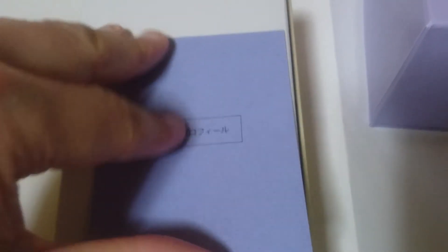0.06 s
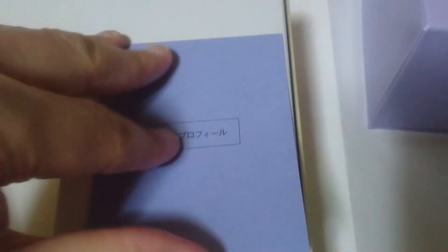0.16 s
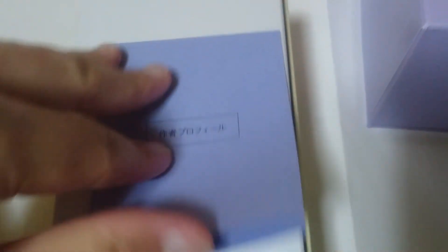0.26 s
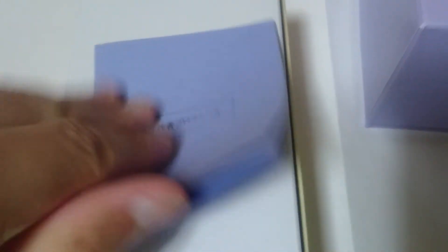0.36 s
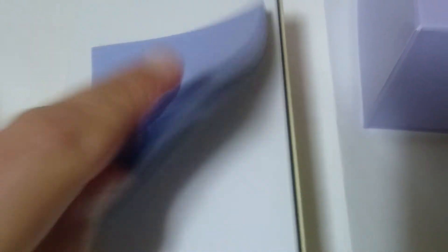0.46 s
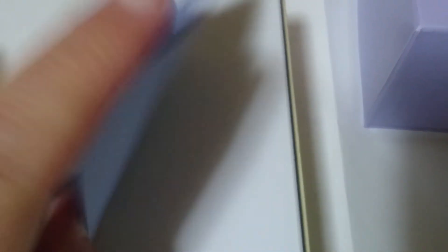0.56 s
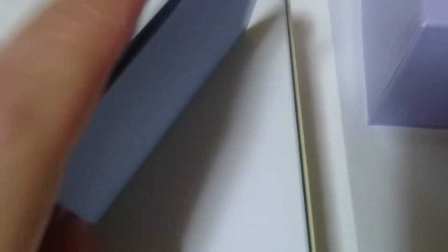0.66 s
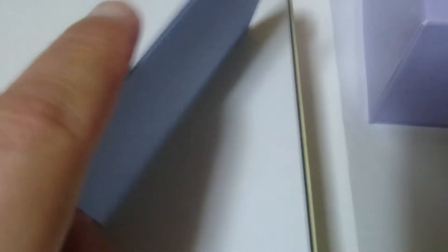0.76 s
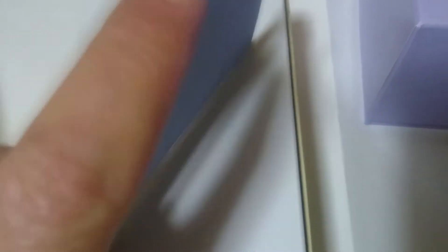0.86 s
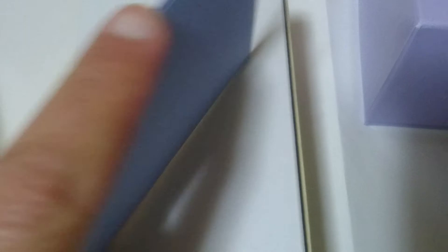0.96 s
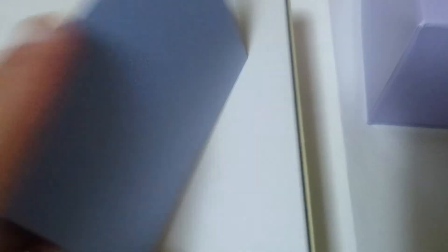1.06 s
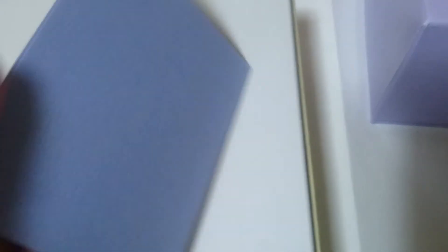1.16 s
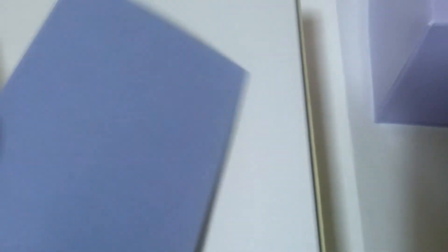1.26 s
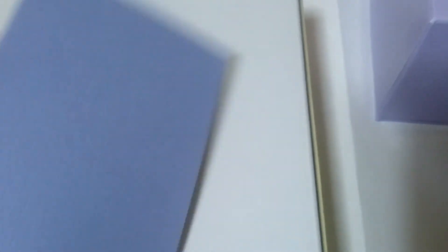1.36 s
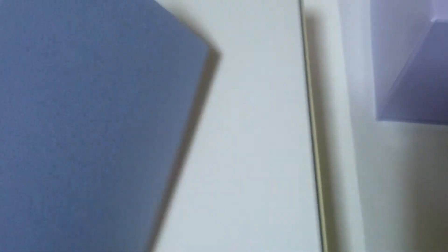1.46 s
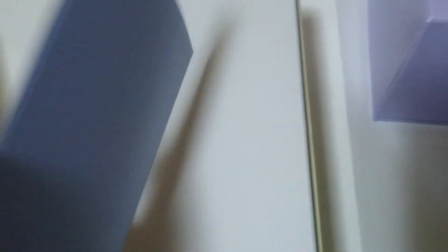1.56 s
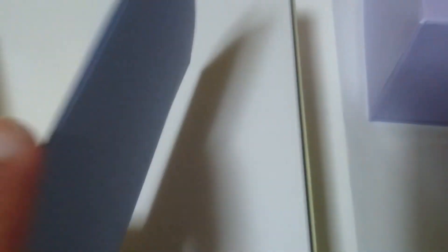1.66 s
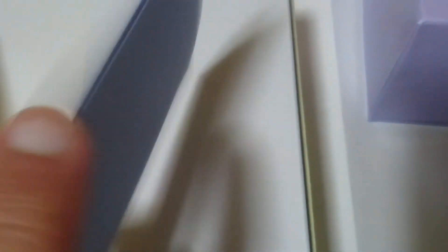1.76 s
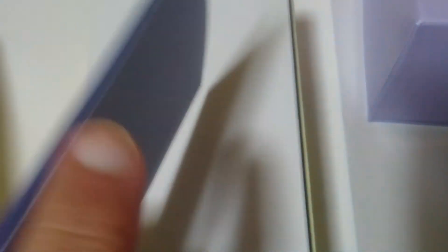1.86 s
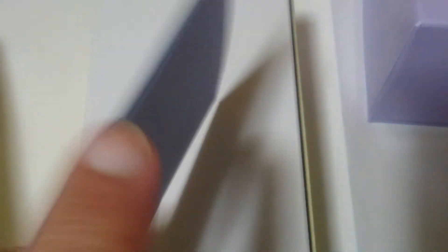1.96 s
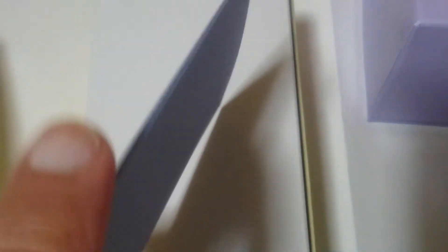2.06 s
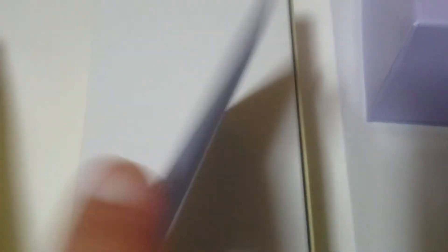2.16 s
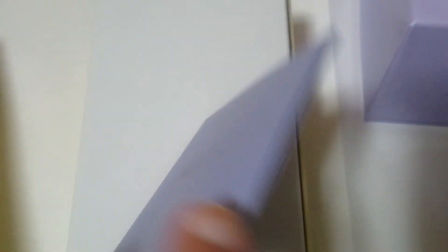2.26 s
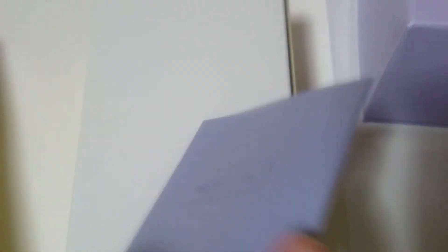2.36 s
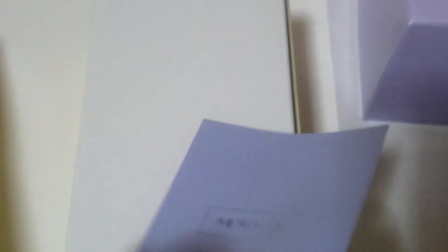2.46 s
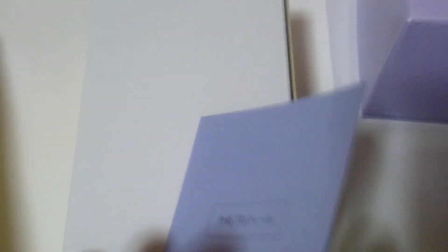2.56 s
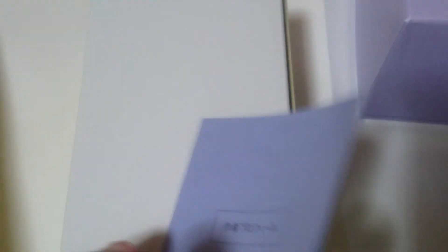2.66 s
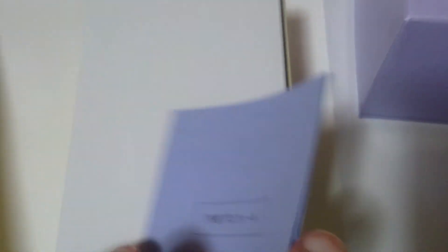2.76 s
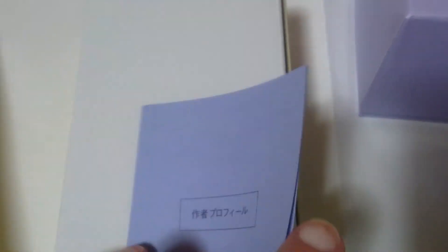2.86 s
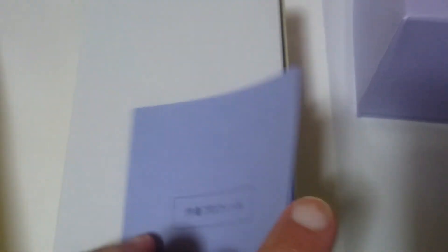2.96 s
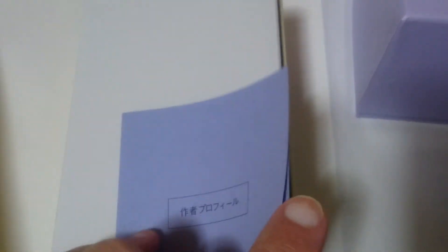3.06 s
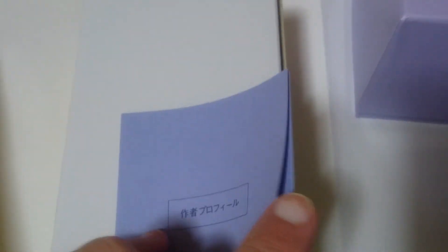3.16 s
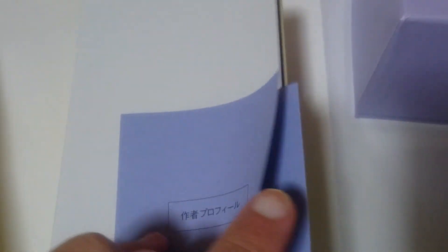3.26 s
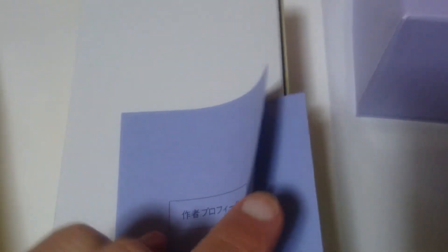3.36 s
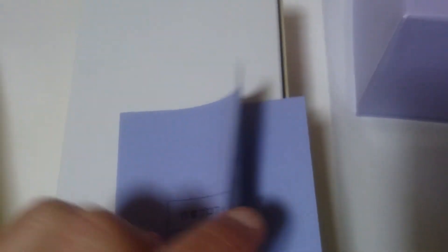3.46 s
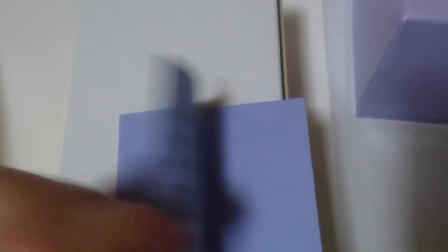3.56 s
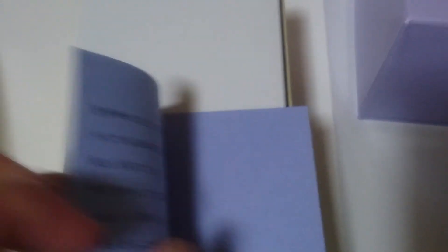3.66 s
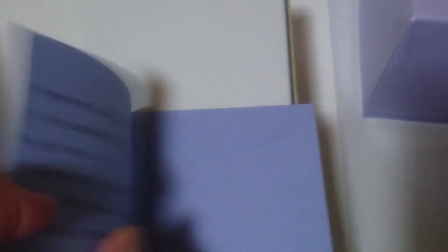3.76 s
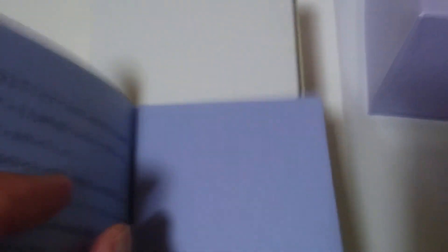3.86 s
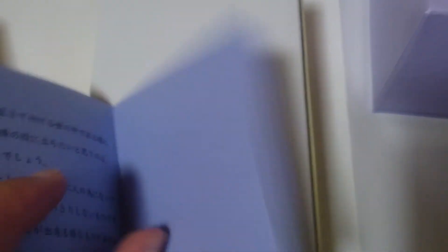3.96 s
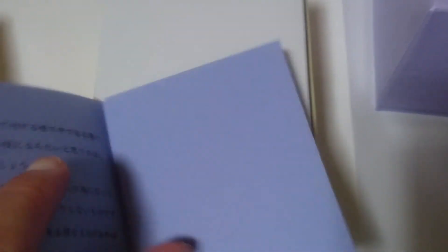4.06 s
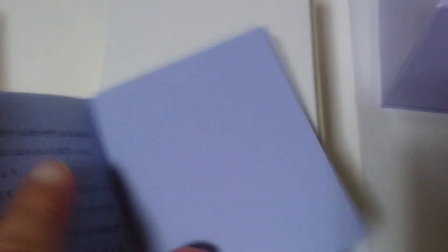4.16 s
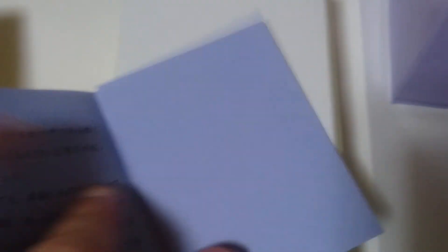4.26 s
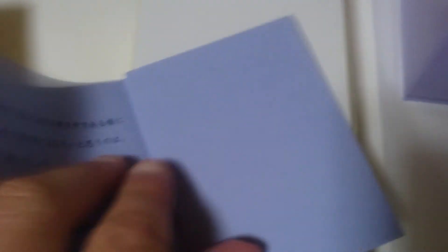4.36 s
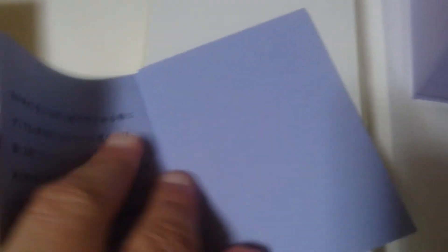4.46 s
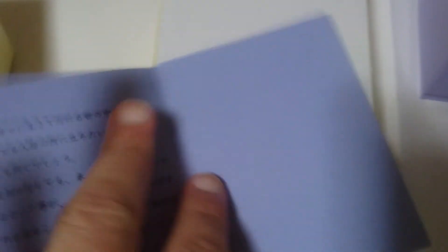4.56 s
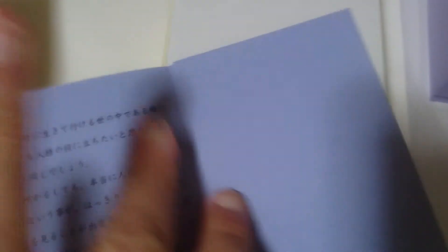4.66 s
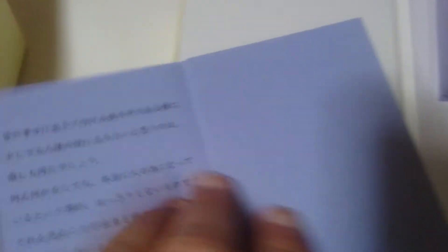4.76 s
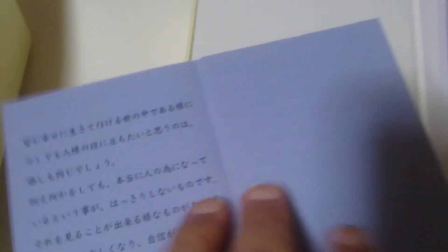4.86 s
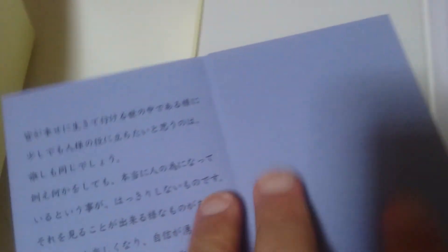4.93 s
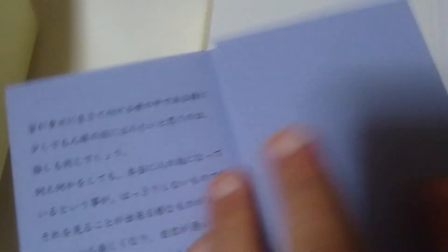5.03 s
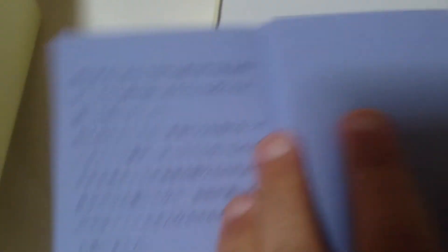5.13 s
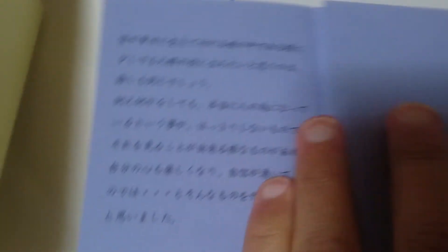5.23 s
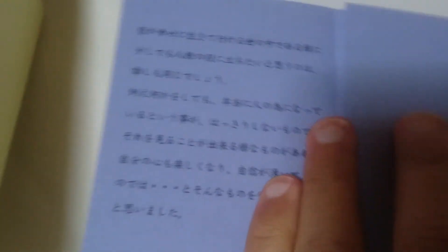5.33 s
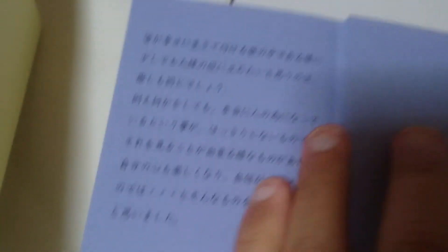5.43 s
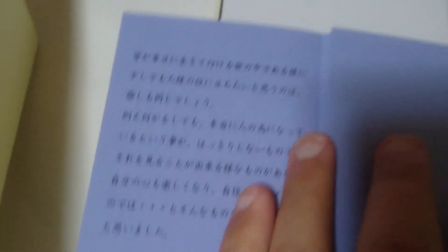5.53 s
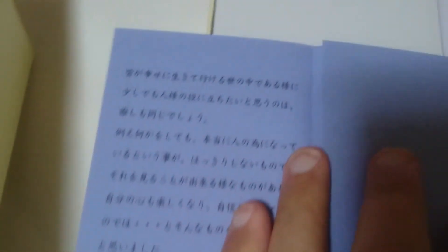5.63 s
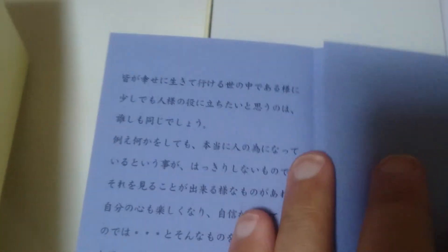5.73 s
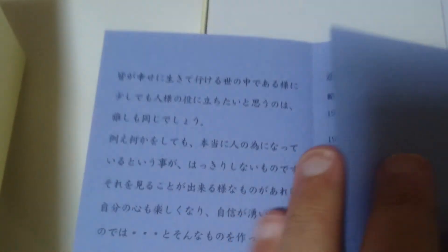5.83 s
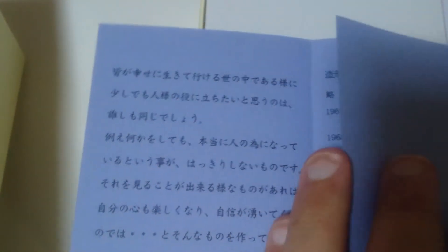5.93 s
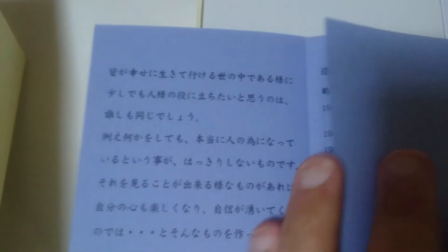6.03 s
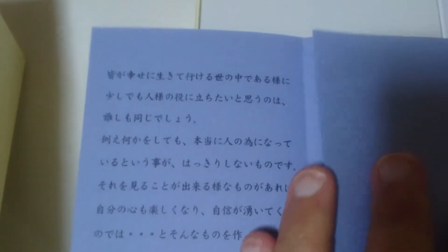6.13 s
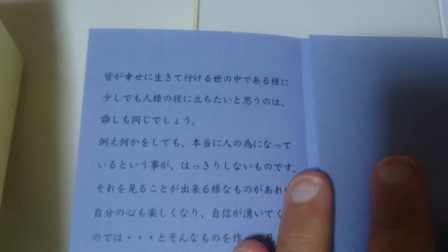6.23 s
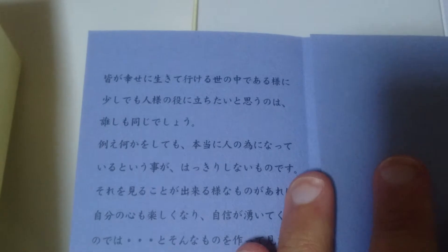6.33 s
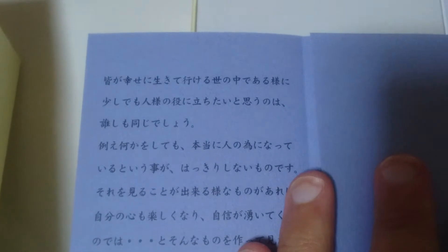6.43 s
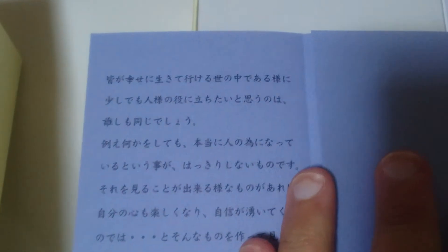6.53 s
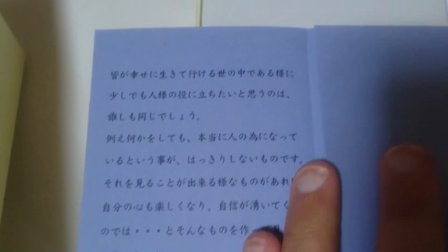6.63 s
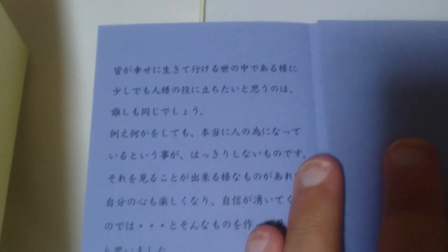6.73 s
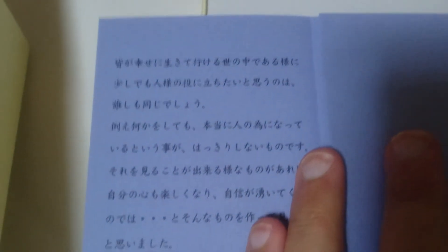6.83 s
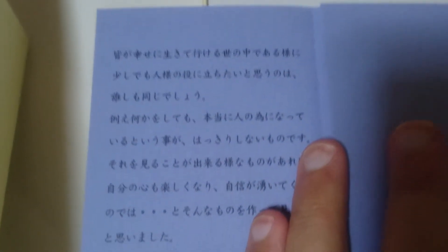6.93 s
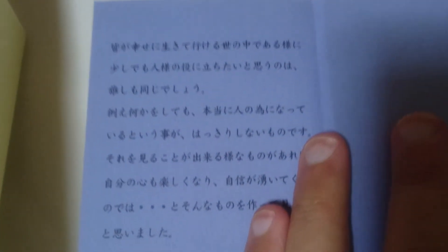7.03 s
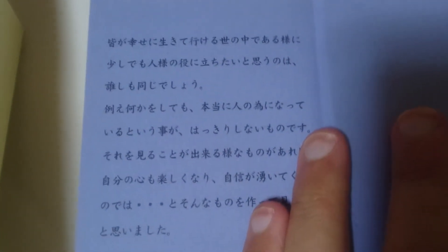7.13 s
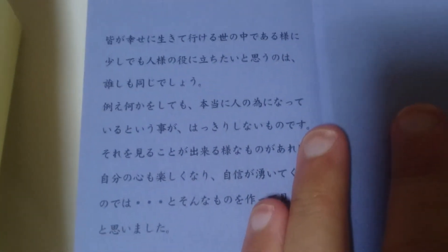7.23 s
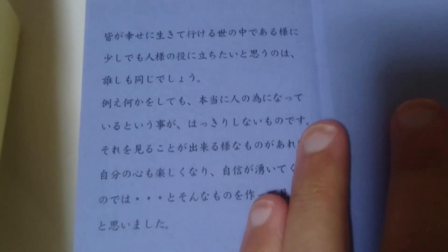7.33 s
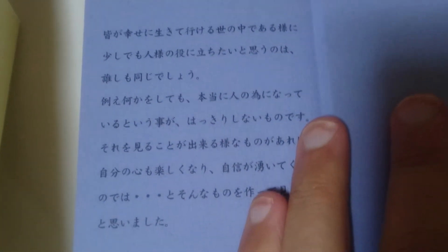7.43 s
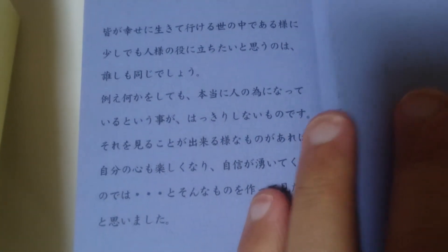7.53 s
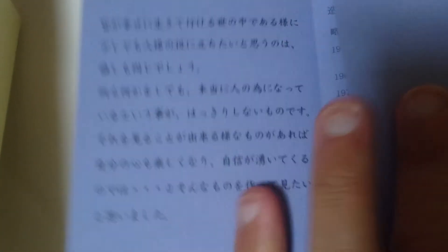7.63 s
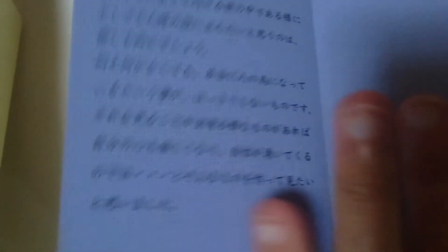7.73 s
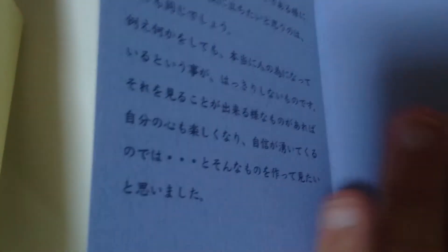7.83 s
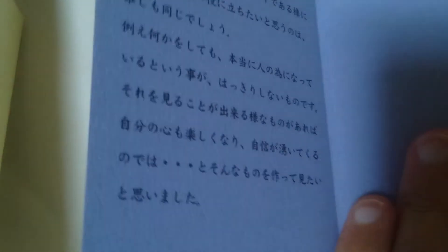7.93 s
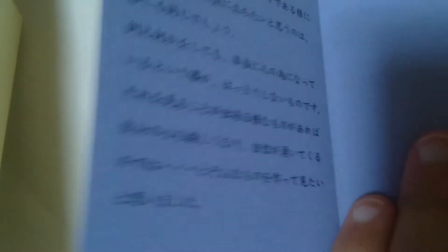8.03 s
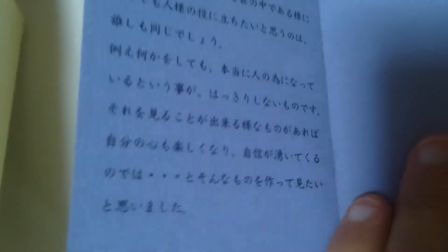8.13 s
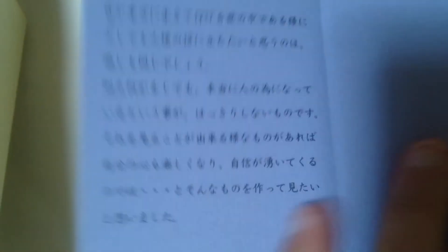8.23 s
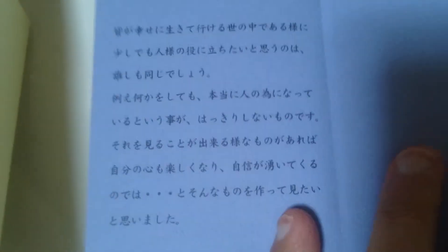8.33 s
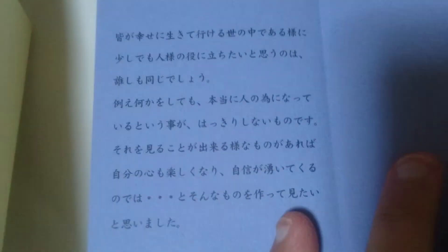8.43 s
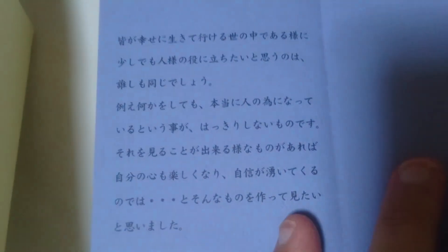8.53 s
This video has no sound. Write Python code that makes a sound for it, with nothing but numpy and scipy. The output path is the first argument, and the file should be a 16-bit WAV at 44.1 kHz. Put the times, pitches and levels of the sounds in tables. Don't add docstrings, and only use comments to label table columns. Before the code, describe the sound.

Close up, fingers handle a small stiff-paper booklet in a quiet room: dry hissing slides, edge scrapes, sharp snaps, hard crackling buckles, then near silence and one brief flip.

```python
import sys
import numpy as np
from scipy import signal
from scipy.fft import rfft, irfft, next_fast_len
from scipy.io import wavfile
from scipy.ndimage import uniform_filter1d, map_coordinates

SR = 44100
rng = np.random.default_rng(int(sys.argv[2]) if len(sys.argv) > 2 else 0)


def wav_out(sig):
    wavfile.write(sys.argv[1], SR, np.round(np.clip(np.atleast_2d(sig).T, -1, 1) * 32767).astype(np.int16))


def magnitude_from_level(level_db):
    exponent = np.asarray(level_db, float) / 20
    return 10 ** exponent


N = 378819
TOP_HZ = 15900

# time_s, drag_db, lightness (light is bright, heavy is dull)
LIFT = [
    (0, -66, -1),
    (.16, -63.5, 1),
    (.3, -58.5, 5),
    (.45, -62, 4.5),
    (.54, -58, 9),
    (.62, -49.5, 4),
    (.69, -62.5, -1),
    (.78, -53.5, -7.5),
    (.85, -73, -12.5),
]
TURN = [
    (1.03, -67.5, 4),
    (1.15, -56.5, 0),
    (1.225, -58.5, -4),
    (1.255, -68, 0.5),
    (1.42, -64, 0),
    (1.48, -74.5, -0.5),
    (1.59, -70, 3.5),
    (1.8, -64.5, -2.5),
    (1.93, -84.5, -4),
]
LAY = [
    (2.17, -88, 0),
    (2.3, -66, -3),
    (2.54, -63, 0.5),
    (2.73, -58, 0.5),
    (2.85, -64.5, -9),
    (2.96, -67, 4),
    (3.12, -71, 0),
    (3.3, -71, 1.5),
]
OPEN = [
    (3.46, -60, -1.8),
    (3.6, -58.5, 1),
    (3.635, -49.5, -1),
    (3.665, -58, -1.8),
    (3.715, -46.5, 0),
    (3.752, -50.5, -1),
    (3.78, -46.5, 1),
    (3.84, -48.5, 0),
    (3.94, -59.5, -1.5),
]
SPREAD = [
    (4.02, -56, 5),
    (4.16, -55.5, 5.5),
    (4.22, -52, 0.5),
    (4.3, -61.5, 1),
]
PRESS = [
    (4.43, -52, 3),
    (4.511, -44, 0.5),
    (4.651, -63, 1.3),
    (4.75, -54, 0.72),
    (4.87, -57.5, 9.5),
    (5.07, -67.5, 0.5),
]
SWEEP = [
    (5.11, -54, 0),
    (5.14, -42.5, -1),
    (5.21, -46.5, -1),
    (5.3, -52.5, -0.91),
    (5.35, -61, -0.91),
    (5.41, -56.5, 0),
    (5.465, -63, 0),
    (5.5, -63, -2),
]
SMOOTH = [
    (5.6, -64, -2.5),
    (5.89, -69, -3),
    (6.01, -65.5, 0),
    (6.11, -77, 1.5),
    (6.33, -73, 1.5),
    (6.5, -100, -2.5),
]
FLIP = [
    (7.65, -101, 1),
    (7.68, -71, 3),
    (7.73, -76, -1),
    (7.85, -58, 1),
    (7.93, -57, 1.5),
    (8.03, -76, -10),
    (8.24, -71.5, -5),
    (8.46, -76, -0.5),
    (8.59, -98, -5),
]
# over_drag_db, per_lightness_db
ANSWER = [(-2, -0.34), (-0.5, 0.49), (-8.5, 1.39), (-25, 3)]
# start_s, length_s, loss_db
ALOFT = [
    (.24, 0.39, 0.5),
    (2.892, 0.11, 5.5),
    (3.464, 0.347, 14.5),
    (5.1, 0.25, 5),
]
# start_s, length_s, first_hz, last_hz, lift_db
CUPS = [(0, 0.31, 1500, 1470, 5.5), (0, .25, 479.4, 520, 7), (.23, .2, 6700, 7000, 4),
        (.25, 0.26, 4300, 4400, 6), (.49, .1, 1952, 1950, 6.5), (1.06, .09, 6600, 6700, 5),
        (1.064, 0.27, 2850, 3370, 5), (1.14, 0.068, 702, 800, 7), (1.58, .08, 6700, 6600, 6),
        (1.65, 0.18, 1205, 1280, 15), (1.76, 0.065, 2395, 2590, 7), (2.66, 0.27, 1224, 1330, 8),
        (3.45, 0.23, 2050, 2000, 8.5), (3.57, .07, 6900, 7100, 6), (3.61, .045, 2300, 2299, 6),
        (3.68, .07, 3200, 3000, 7), (3.67, 0.24, 1800, 1844, 5), (3.76, 0.043, 3294, 3000, 4.5),
        (3.937, 0.39, 2506, 2630, 3.5), (4.46, 0.089, 900, 1000, 6.5), (4.47, 0.11, 1300, 2100, 10.5),
        (5.111, .08, 2820, 3000, 17.5), (5.12, 0.064, 2150, 2250, 7.5), (5.183, 0.043, 3000, 4300, 12),
        (5.217, 0.1, 3250, 3206, 14), (5.215, 0.14, 4350, 4400, 9), (5.225, 0.037, 2300, 2300, 7),
        (5.362, 0.12, 3500, 3600, 13), (5.362, 0.13, 4400, 4400, 6.5), (5.544, 0.26, 1590, 1730, 6),
        (5.854, 0.31, 2850, 2765, 7), (7.85, 0.12, 640, 650, 11), (7.87, 0.1, 1840, 1895, 6.5),
        (7.865, 0.033, 3400, 3300, 6.5), (8.08, .03, 3290, 3200, 7.5)]

# freq_hz, level_db
BODY_COLOUR = [(130, -25.5), (280, -1.5), (480, -3.5), (650, -2), (950, -5), (1400, -7), (2500, -41)]
# freq_hz, level_db
SHEET_COLOUR = [(600, -25.5), (1050, -11), (1500, 0.5), (2800, -1), (3700, -4.5), (4500, -4), (5300, -13.5),
                (7000, -39)]
# freq_hz, level_db
FIZZ_COLOUR = [(3500, -28), (5000, -6.5), (5900, -5.5), (7400, 0), (8600, -8.5), (10500, -17),
               (12500, -30.5)]
# freq_hz, level_db
AIR_COLOUR = [(8500, -38), (10500, -8), (12000, -7.5), (13500, -2), (15800, -2.5), (17000, -9)]
# freq_hz, level_db
EDGE_COLOUR = [(400, -23), (1200, -5.5), (2800, -1), (4300, -1), (5500, -9), (7500, -1), (9000, -11),
               (11000, -17), (14000, -15), (17000, -12)]

# peak_s, rms_db, rise_s, tilt_db_per_octave
STOPS = [(1.824, -53.5, 0.015, -3), (2.835, -53, 0.061, -3), (3.165, -64, 0.036, -1),
         (3.415, -45.5, 0.018, 0.5), (3.945, -49.5, 0.027, -4), (4.236, -45.5, 0.019, -2.5),
         (4.414, -27, 0.0069, -5), (5.455, -56.5, 0.06, -5), (5.897, -58, 0.048, -3),
         (6.112, -61.5, 0.072, -3), (6.241, -65.5, .024, -1.5), (7.891, -52.5, 0.046, 8)]
# peak_s, rms_db, rise_s, tilt_db_per_octave
BRUSHES = [(.4, -50, 0.035, 2.5), (.751, -51, 0.0086, -1), (.922, -58.5, 0.0049, -4.5),
           (1.397, -46.5, 0.0076, 0), (1.442, -55, 0.0077, -4), (1.52, -58, 0.0052, -7),
           (1.947, -54.5, 0.0097, 2), (2.001, -52, 0.0074, 2.5), (2.205, -63.5, .005, -1.5),
           (2.575, -47.5, 0.0054, -1), (2.955, -56.5, .006, 0.5), (3.374, -51.5, 0.018, -3),
           (3.725, -55, 0.019, -2.5), (3.825, -44.5, 0.0095, 6), (4.56, -49, 0.032, 4.5),
           (4.74, -52.5, 0.066, 8), (5.01, -57.5, 0.019, 0), (5.18, -44.5, 0.056, -0.5),
           (7.69, -49, 0.0075, -1), (8.225, -62, .006, -6.5), (8.287, -51, 0.024, 3)]
# peak_s, rms_db, rise_s, tilt_db_per_octave
CUTS = [
    (.648, -28.5, 0.012, 3),
    (.854, -51.5, 0.023, -2.5),
    (3.438, -45, .03, .5),
    (3.648, -53.5, .015, -4),
    (4.6, -40.5, .013, -1.5),
    (8.123, -58, .034, -0.5),
]

# (start_s, peak_db), then modes of freq_hz, width_hz, level_db
KNOCKS = [
    ((.7057, -8), [(486, 260, 0.5), (1000, 600, -8.5), (1380, 560, -5.5), (2200, 1100, -8), (3000, 800, -13.5), (4835, 1100, -25), (7050, 1500, -35)]),
    ((1.0019, -20.5), [(447, 260, 7.5), (1100, 800, -2), (2000, 850, -13.5), (3200, 1400, -27), (5150, 1500, -36), (7520, 2000, -44)]),
    ((4.2428, -9.5), [(400, 300, -11.5), (850, 500, -3), (1450, 700, 0.5), (2490, 600, -7), (3530, 600, -12.5), (4300, 700, -21), (7050, 1400, -25.5)]),
    ((8.0568, -23), [(600, 300, -2), (1000, 300, 2.5), (1530, 340, 4), (2430, 550, -9.5), (3370, 600, -13), (4400, 700, -16), (6800, 1500, -31)]),
    ((8.3075, -21.5), [(522, 530, -10), (900, 420, -9), (1470, 470, 0), (2340, 530, -2.5), (3900, 800, -8), (4600, 630, -11.5)]),
]
# start_s, peak_db, tilt_db_per_octave
PRICKS = [(.476, -43, -2), (.49, -47.5, 1), (3.342, -46, 2), (3.36, -35.5, 5.5), (3.369, -37, 2),
          (3.385, -37, 4), (3.4, -36, 6), (3.405, -30, 3.5), (3.4069, -31, 12), (3.806, -36, 0),
          (3.814, -34, -1), (3.823, -30.5, -4), (3.833, -31.5, -2), (4.282, -37.5, -1), (4.484, -32, 2),
          (4.501, -35, -2), (4.523, -34, -0.5), (4.605, -15, -2.5), (4.6115, -17, -5.5), (4.749, -30.5, -3),
          (4.772, -34.5, -1), (4.829, -28, -2.5), (4.8413, -26, -3), (4.8535, -27.5, 1),
          (7.7015, -31.5, -8.5), (7.872, -44, -3), (7.982, -55, -5), (8.004, -48.5, -2)]
# freq_hz, width_hz, level_db
SHEET_MODES = [(498, 500, -7), (1450, 890, 0), (2450, 900, -2), (3500, 1000, -8), (4500, 1000, -11.5),
               (7100, 2000, -16.5)]

# start_s, peak_db, ring_hz, body_db
POPS = [
    (2.246, -54.5, 895, 16),
    (2.301, -50, 1210, -9),
    (4.411, -15, 1160, -21),
    (4.416, -15, 2483, -15),
    (8.366, -59, 738, 1),
]
# start_s, peak_db, ring_hz, body_db
SNAPS = [
    (2.418, -25.5, 1370, -14.5),
    (2.522, -29.5, 2100, -16.5),
    (3.312, -42.5, 2910, -25),
    (3.904, -36, 830, -6),
]
# start_s, peak_db, ring_hz, body_db
FLICKS = [
    (0.588, -30, 3820, -29.5),
    (5.053, -27, 2534, -18),
]
# start_s, peak_db, ring_hz, t60_s
CRUMPLES = [(0.66, -33, 1680, 0.021), (.708, -27, 2290, .035), (.716, -32, 1900, 0.044),
            (0.769, -30, 1786, 0.026), (1.004, -34, 1300, 0.048), (2.421, -31.5, 1374, 0.03),
            (2.433, -31, 830, 0.018), (2.573, -41.5, 700, 0.13), (4.866, -30, 600, 0.04),
            (5.061, -40, 756.4, 0.075), (7.695, -33.5, 3184, 0.027), (8.118, -44.5, 750, 0.046)]
# start_s, peak_db, ring_hz, t60_s
CRINKLES = [(2.952, -48.5, 1470, 0.059), (3.818, -33, 1820, 0.07), (4.031, -31.5, 1600, 0.064),
            (4.247, -15, 1200, 0.031), (4.35, -35.5, 1440, 0.1), (4.417, -23, 763, 0.046),
            (4.594, -23, 2080, 0.07), (4.603, -14.5, 1100, 0.055), (4.611, -16.5, 1240, 0.027),
            (4.623, -24, 770, 0.076), (4.638, -30, 950, 0.08), (4.807, -30.5, 650, 0.043),
            (4.836, -21, 1170, 0.076), (4.852, -24.5, 800, 0.06), (4.86, -23, 640, 0.06),
            (7.671, -43, 2700, 0.05), (7.836, -45, 620, 0.037), (8.058, -33.5, 2700, 0.035),
            (8.31, -38.5, 1990, .04)]
# start_s, peak_db, ring_hz
TICKS = [
    (4.2484, -16.5, 2440),
    (4.853, -32, 4400),
]
# freq_hz, width_hz, level_db
BOOKLET_MODES = [(273, 110, 0), (461.5, 260, 2)]

# time_s, pitch_hz, level_db
SQUEAKS = [
    [(5.45, 10900, -87), (5.49, 11800, -89), (5.58, 11950, -87), (5.645, 11050, -89), (5.71, 10950, -89),
     (5.75, 10300, -90)],
    [(5.69, 13600, -88), (5.74, 12900, -85.5), (5.79, 11500, -88), (5.85, 10300, -91)],
]
# start_s, peak_db, pitch_hz, t60_s
BUMPS = [(0.641, -51, 94.2, 0.11), (0.889, -51, 86.1, 0.1), (1.388, -59.5, 149, 0.089),
         (1.811, -64, 56.5, 0.096), (2.24, -72, 148, 0.11), (2.416, -54.5, 86.1, 0.13),
         (2.525, -51.5, 150, 0.069), (2.989, -50, 88.8, 0.061), (3.161, -59, 80.7, 0.098),
         (4.112, -52, 107, 0.12), (3.822, -49, 150, 0.05), (4.242, -32, 128, 0.044),
         (4.402, -35.5, 116, 0.1), (4.591, -37.5, 80, 0.084), (4.832, -40.5, 68.5, 0.18),
         (4.85, -39, 141, 0.073), (4.906, -40, 99, 0.043), (5.05, -44, 98, 0.05), (5.753, -44, 54, 0.055),
         (5.859, -47, 72.7, 0.1), (6.304, -54.5, 73.5, 0.13), (7.683, -58.5, 127, 0.18),
         (7.699, -39, 300, 0.06), (8.061, -50, 53.8, 0.18)]
# freq_hz, level_db
DESK_COLOUR = [(25, -22), (60, 6), (120, -6.5), (220, -12), (350, -44.5)]
# freq_hz, t60_s
WALLS = [(200, 0.26), (2000, 0.16), (10000, 0.17)]
# freq_hz, level_db
ROOM_COLOUR = [(25, -18), (55, 5.5), (85, -10.5), (125, -17.5), (300, -17), (1000, -18), (3600, -26.5),
               (4700, -28), (5600, -31), (12000, -36.5), (13000, -33), (15800, -34)]


def unit(x):
    return x / np.sqrt(np.mean(np.abs(x) ** 2) + 1e-20)


def peaked(x):
    return x / abs(x).max()


def along(points, hz):
    f, v = np.transpose(points)
    return np.interp(np.log(hz + 1), np.log(f + 1), v)


def wobble(rate):
    knots = rng.standard_normal(int(N * rate / SR) + 4)
    return map_coordinates(knots, [np.arange(N) * rate / SR])


def filtered(x, response):
    m = next_fast_len(len(x) + 4096)
    return irfft(rfft(x, m) * response(np.fft.rfftfreq(m, 1 / SR)), m)[:len(x)]


def mode(f, hz, width_hz):
    return 1j * f * width_hz / (hz * hz - f * f + 1j * f * width_hz)


def grit(n, spiky_db):
    size_db = spiky_db * np.minimum(rng.exponential(size=n), 4)
    return unit(rng.standard_normal(n) * magnitude_from_level(size_db))


def held(t, s, length):
    return np.clip(np.minimum(t - s, s + length - t) / 0.02 + 0.5, 0, 1)


def hand():
    gestures = LIFT + TURN + LAY + OPEN + SPREAD + PRESS + SWEEP + SMOOTH + FLIP
    s, drag_db, light = np.transpose(gestures)
    light = np.clip(light, -12, 10)
    t = np.arange(N) / SR
    body_db, *rest = [np.interp(t, s, drag_db + over_db + lean_db * light) for over_db, lean_db in ANSWER]
    aloft_db = sum(db * held(t, start, length) for start, length, db in ALOFT)
    return [body_db - aloft_db, *rest]


def cupping(hz, t):
    gain_db = np.zeros((len(hz), len(t)))
    for s, length, first_hz, last_hz, lift_db in CUPS:
        centre_hz = np.interp(t, (s, s + length), (first_hz, last_hz))
        distance = np.log((hz[:, None] + 1) / centre_hz) / 0.12
        gain_db += lift_db * held(t, s, length) * (np.exp(-distance ** 2) - 0.3)
    return gain_db


def rubbing():
    jerk_db = 0.8 * wobble(25) + 1.1 * wobble(70)
    out = np.zeros(N)
    for colour, db in zip((BODY_COLOUR, SHEET_COLOUR, FIZZ_COLOUR, AIR_COLOUR), hand()):
        hz, frames, z = signal.stft(grit(N, spiky_db=1.0), SR, nperseg=512)
        patches = uniform_filter1d(rng.standard_normal(z.shape), size=5, axis=0)
        patches_db = 2.1 * unit(uniform_filter1d(patches, size=5, axis=1))
        gain_db = along(colour, hz)[:, None] + patches_db + cupping(hz, frames)
        layer = unit(signal.istft(z * magnitude_from_level(gain_db), SR, nperseg=512)[1][:N])
        out += layer * magnitude_from_level(db + jerk_db + 1.0 * wobble(40))
    return out


def crackle():
    breaks_per_s = 400
    breaks = (rng.random(N) < breaks_per_s / SR) * rng.standard_normal(N) * magnitude_from_level(3 * wobble(30))
    clicks = unit(filtered(breaks, lambda f: mode(f, 2100, 1500) ** 2))
    return magnitude_from_level(hand()[1] - 13) * clicks


def slips():
    out, t = np.zeros(N + SR), np.arange(-8192, 8192) / SR
    for events, fall_over_rise in ((STOPS, 0.4), (BRUSHES, 1.15), (CUTS, 0.14)):
        for s, db, rise, tilt_db in events:
            colour = lambda f: magnitude_from_level(along(EDGE_COLOUR, f) + tilt_db * np.log2((f + 50) / 4000))
            scrape = unit(filtered(grit(len(t), spiky_db=3.5), colour))
            swell = np.exp(-0.5 * (t / np.where(t < 0, rise, rise * fall_over_rise)) ** 2)
            out[round(s * SR):][:len(t)] += magnitude_from_level(db) * swell * scrape
    return out[8192:][:N] * magnitude_from_level(2.1 * wobble(120))


def prick_modes(tilt_db):
    return [(hz * rng.uniform(0.92, 1.08), width_hz, db + tilt_db * np.log2(hz / 1500) + rng.normal(0, 2))
            for hz, width_hz, db in SHEET_MODES]


def knocks():
    out, t = np.zeros(N + SR), np.arange(2048) / SR
    pull = -np.exp(-((t - 0.0002) / 0.00004) ** 2)
    pricks = [((s, db), prick_modes(tilt_db)) for s, db, tilt_db in PRICKS]
    for (s, db), modes in KNOCKS + pricks:
        ring = filtered(pull, lambda f: sum(magnitude_from_level(d) * mode(f, c, w) ** 2 for c, w, d in modes))
        out[round(s * SR):][:len(ring)] += magnitude_from_level(db) * peaked(ring)
    return out[:N]


def buckles(events, pull_db, rise):
    out, t = np.zeros(N + SR), np.arange(4096) / SR
    pull = magnitude_from_level(pull_db) * np.exp(-((t - 0.0008) / 0.0001) ** 2)

    def patch_modes(f, hz):
        pair = mode(f, hz, 0.42 * hz) - 0.5 * mode(f, 4.8 * hz, 0.6 * hz)
        return pair * mode(f, 0.99 * hz, 1.5 * hz) ** 2

    def body_modes(f):
        return sum(magnitude_from_level(d) * mode(f, c, w) for c, w, d in BOOKLET_MODES) * mode(f, 510, 540)

    def crisp_modes(f):
        return mode(f, 3000, 1500) - mode(f, 4410, 1200) + mode(f, 5840, 2700) + 0.29 * mode(f, 19000, 6000)

    for s, db, hz, body_db, crisp_db, t60 in events:
        fade = magnitude_from_level(-60 * t / t60) * (1 - np.exp(-t / rise))
        kinks = fade * grit(len(t), spiky_db=5.0)
        push = kinks - pull
        patch = 0.68 * peaked(filtered(push, lambda f: patch_modes(f, hz)))
        body = magnitude_from_level(body_db + 5) * peaked(filtered(push, body_modes))
        crack = magnitude_from_level(crisp_db + 4.0) * peaked(filtered(kinks * fade, crisp_modes))
        out[round(s * SR):][:len(t)] += magnitude_from_level(db) * (patch + body + crack)
    return out[:N]


def creases():
    sharp = []
    for events, crisp_db, t60 in ((POPS, -35.5, 0.029), (SNAPS, -13, 0.038), (FLICKS, -8.5, 0.029)):
        sharp += [(*e, crisp_db, t60) for e in events]
    clumps = []
    for events, body_db in ((CRUMPLES, -7), (CRINKLES, -18)):
        for s, db, hz, t60 in events:
            crisp_db = -26 - 0.6 * (db + 33)
            clumps.append((s, db, hz, body_db, crisp_db, t60))
    ticks = [(*e, -31.5, -24.5, 0.014) for e in TICKS]  # body_db, crisp_db, t60_s
    out = buckles(sharp, pull_db=4.5, rise=0.00027)
    out += buckles(clumps, pull_db=-8.5, rise=0.0014)
    return out + buckles(ticks, pull_db=11.0, rise=0.00067)


def squeaks():
    t, out = np.arange(N) / SR, np.zeros(N)
    for line in SQUEAKS:
        s, hz, db = np.transpose(line)
        pitch_hz = np.interp(t, s, hz) + 40 * wobble(60)
        level_db = np.interp(t, s, db, left=-200, right=-200) + 2.5 * wobble(40)
        out += magnitude_from_level(level_db) * np.sin(2 * np.pi * np.cumsum(pitch_hz) / SR)
    return out


def bumps():
    out, t = np.zeros(N + SR), np.arange(SR // 4) / SR
    for s, db, hz, t60 in BUMPS:
        fade = magnitude_from_level(db + 3.0 - 60 * t / t60) * (1 - np.exp(-t / 0.002))
        out[round(s * SR):][:len(t)] += fade * np.sin(2 * np.pi * hz * t)
    return out[:N]


def rumble():
    push_db = 0.71 * (hand()[0] + 61.4)
    noise = filtered(rng.standard_normal(N), lambda f: magnitude_from_level(along(DESK_COLOUR, f)))
    return magnitude_from_level(-74.0 + push_db + 4.5 * wobble(8)) * unit(noise)


def room(x):
    hz, t, z = signal.stft(rng.standard_normal(SR // 3), SR, nperseg=256)
    decay = magnitude_from_level(-60 * t / along(WALLS, hz)[:, None])
    tail = signal.istft(z * decay, SR, nperseg=256)[1]
    late = np.pad(x, (200, 0))
    return signal.fftconvolve(late, tail / np.linalg.norm(tail))[:N]


def background():
    noise = filtered(rng.standard_normal(N), lambda f: magnitude_from_level(along(ROOM_COLOUR, f)))
    return magnitude_from_level(-69.5 + 0.21 * wobble(0.95)) * unit(noise)


def scene():
    paper = knocks() + creases() + slips() + crackle()
    mono = paper + magnitude_from_level(-17) * room(paper) + rubbing()
    mono += rumble() + bumps() + squeaks() + background()
    return np.array([mono, mono])


def thin_top(x, above_hz, share):
    hz, t, z = signal.stft(x, SR, window="cosine", nperseg=2048)
    width = 8
    bands = np.add.reduceat(abs(z) ** 2, np.arange(0, len(hz), width))
    power = bands.repeat(width, axis=0)[:len(hz)]
    top = (hz > above_hz) & (hz < TOP_HZ)
    faint = top[:, None] & (power < np.quantile(power[top], share))
    return signal.istft(z * ~faint, SR, window="cosine", nperseg=2048)[1][:N]


def low_pass(x):
    return signal.sosfilt(signal.butter(12, 15970, fs=SR, output="sos"), x)


def record(dry):
    mic = lambda f: (1j * f / (40 + 1j * f)) ** 3 * (f < TOP_HZ)
    heard = thin_top(filtered(dry[0], mic), above_hz=12750, share=0.22)
    heard = heard - 0.0004
    return low_pass(np.array([heard, heard]))


dry = scene()
out = record(dry)
wav_out(out)
```